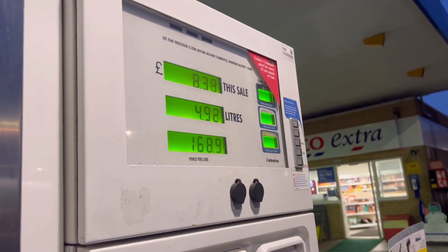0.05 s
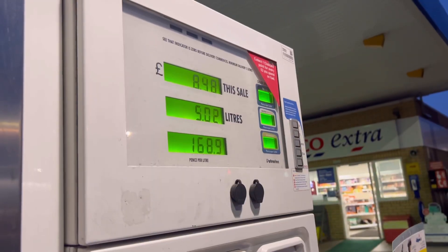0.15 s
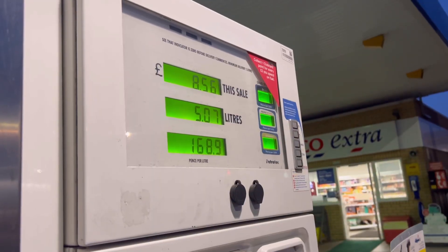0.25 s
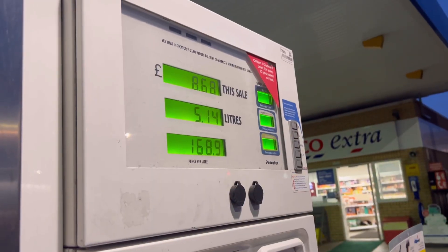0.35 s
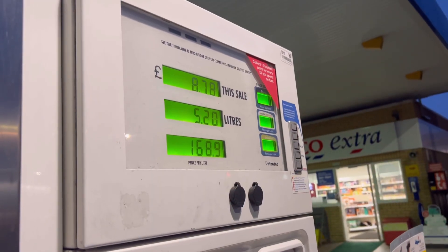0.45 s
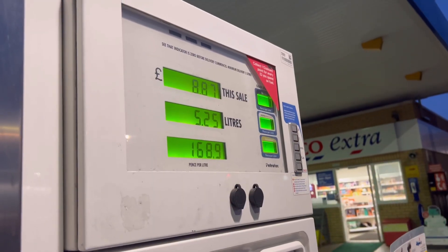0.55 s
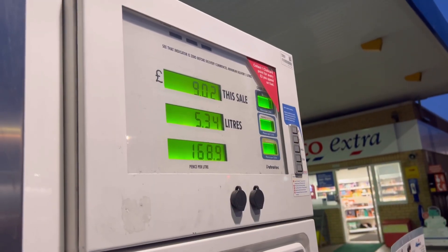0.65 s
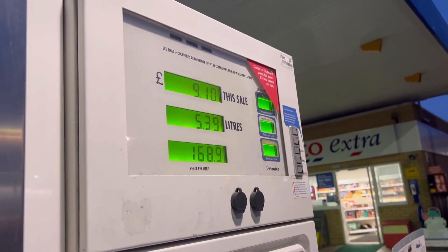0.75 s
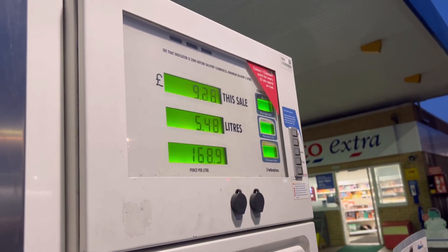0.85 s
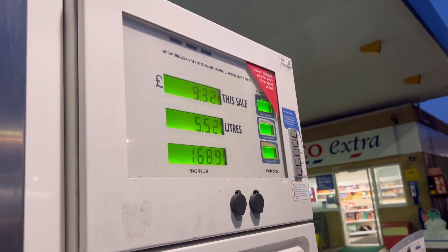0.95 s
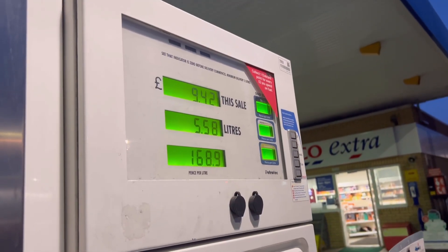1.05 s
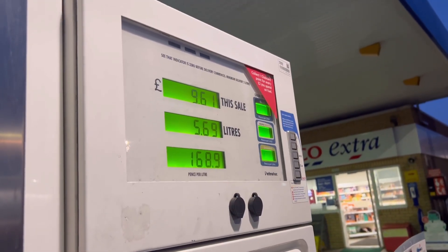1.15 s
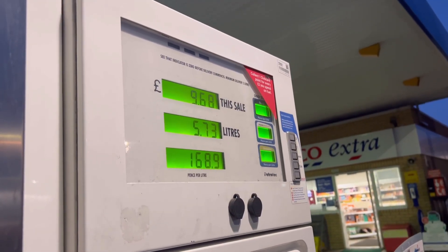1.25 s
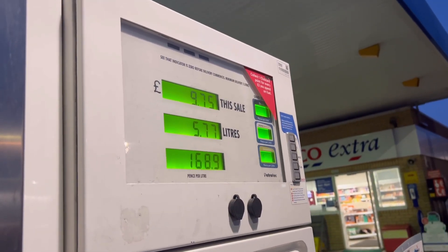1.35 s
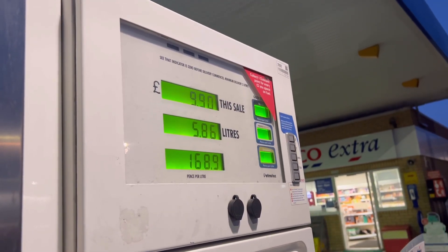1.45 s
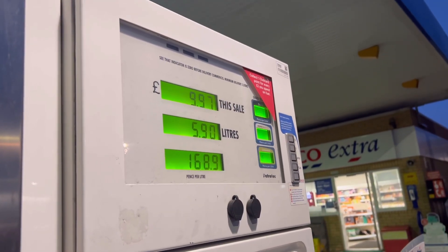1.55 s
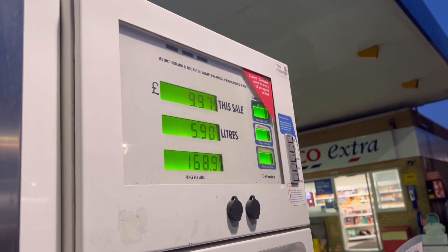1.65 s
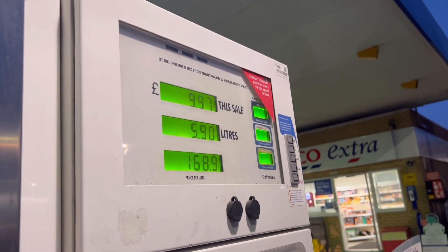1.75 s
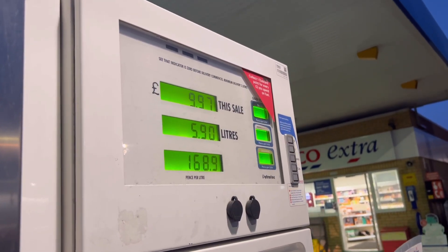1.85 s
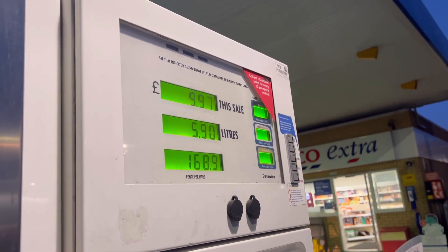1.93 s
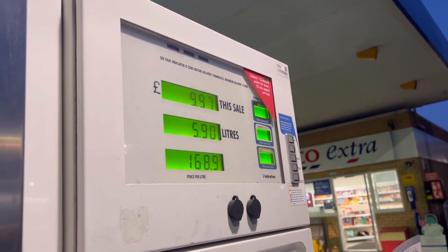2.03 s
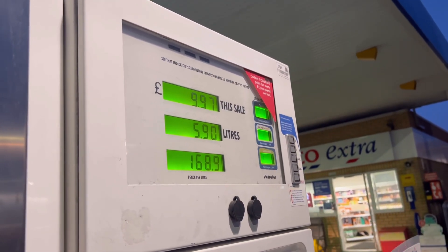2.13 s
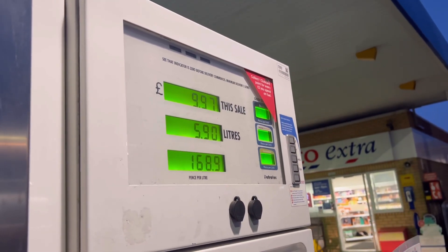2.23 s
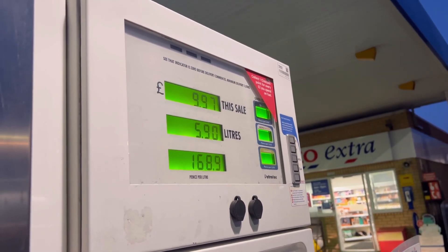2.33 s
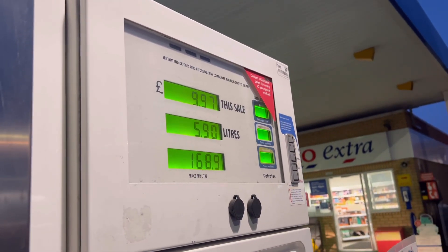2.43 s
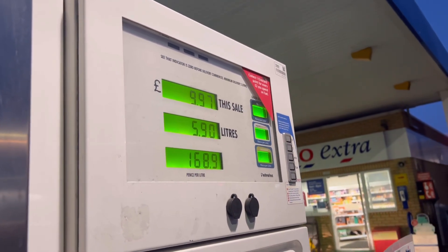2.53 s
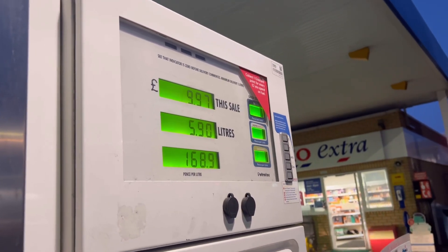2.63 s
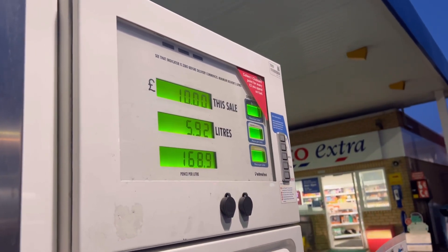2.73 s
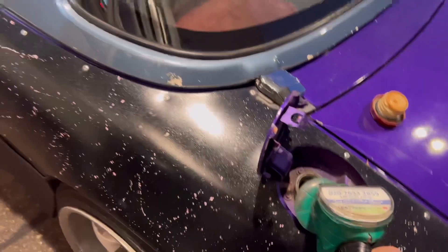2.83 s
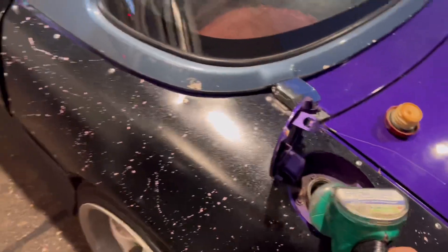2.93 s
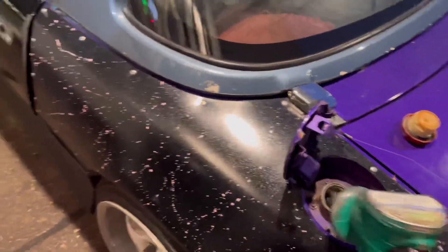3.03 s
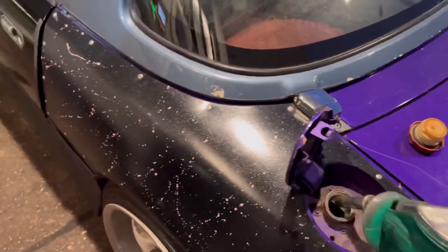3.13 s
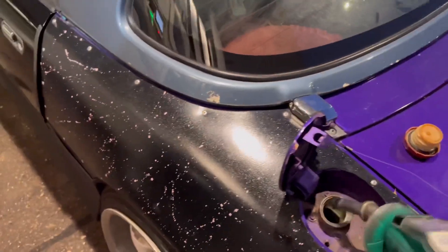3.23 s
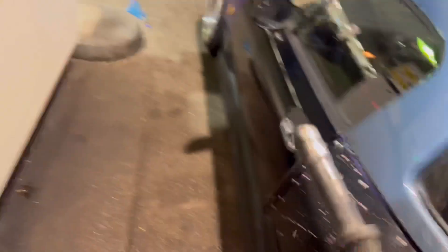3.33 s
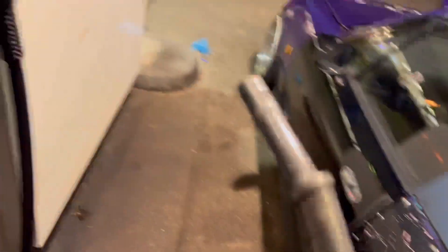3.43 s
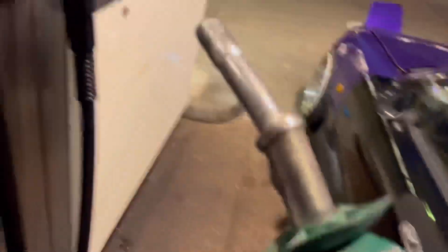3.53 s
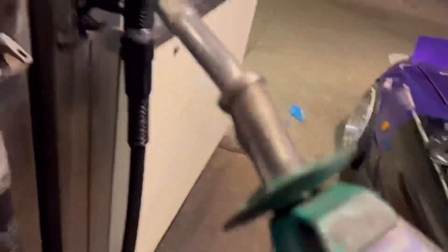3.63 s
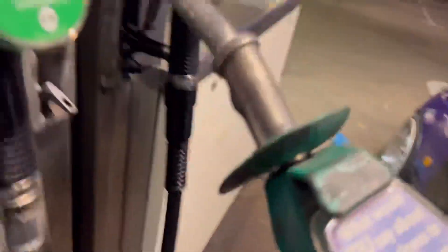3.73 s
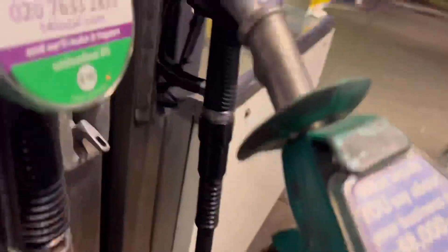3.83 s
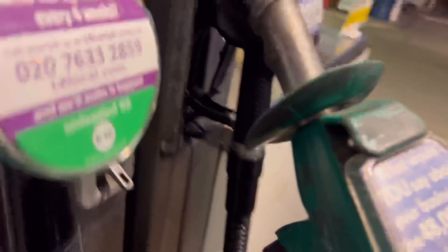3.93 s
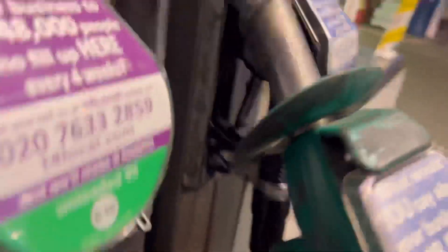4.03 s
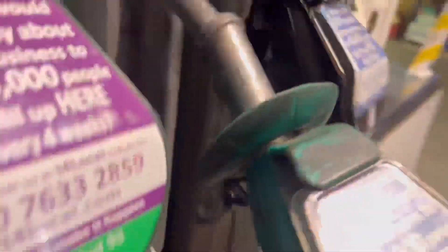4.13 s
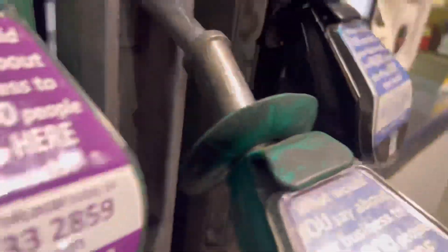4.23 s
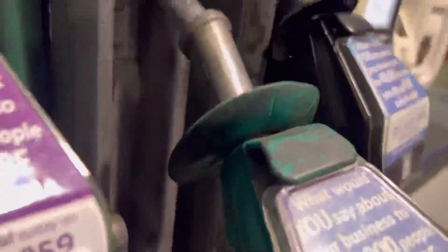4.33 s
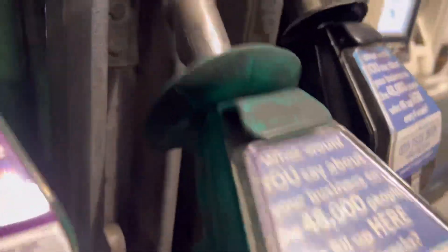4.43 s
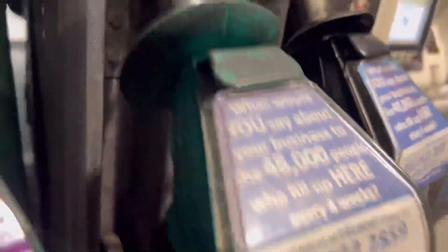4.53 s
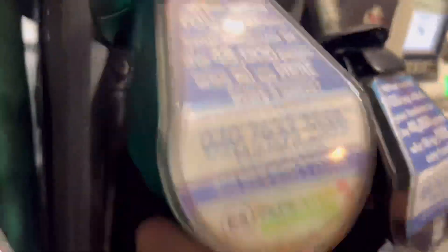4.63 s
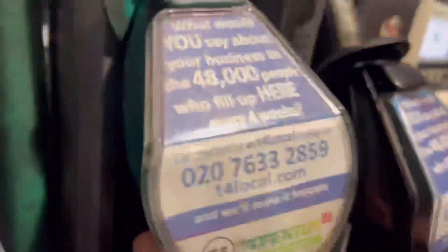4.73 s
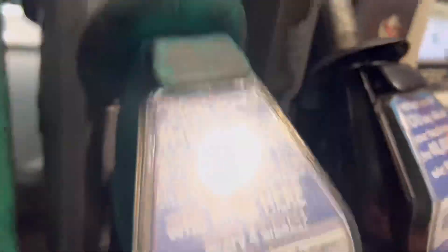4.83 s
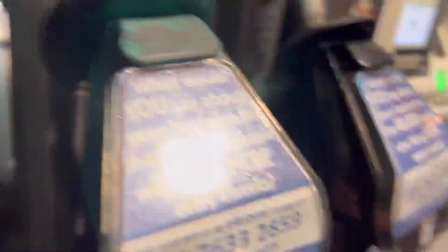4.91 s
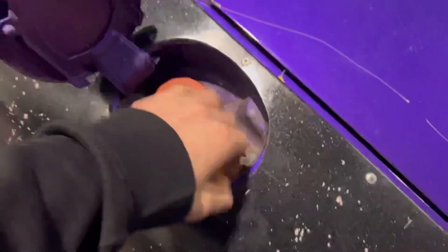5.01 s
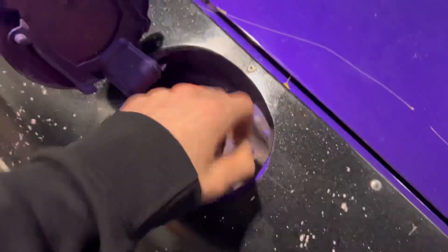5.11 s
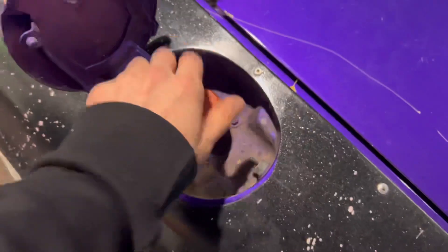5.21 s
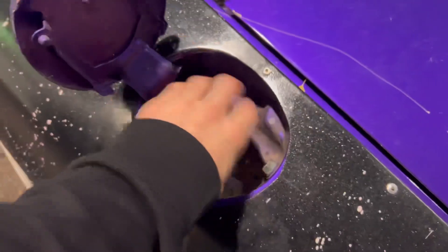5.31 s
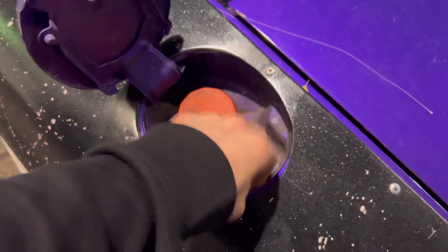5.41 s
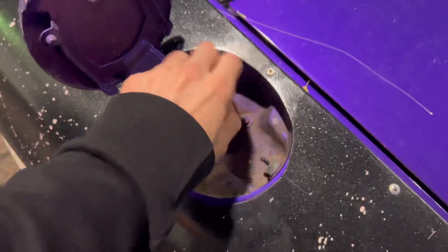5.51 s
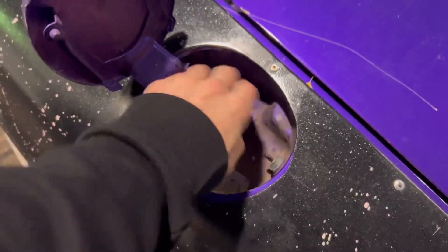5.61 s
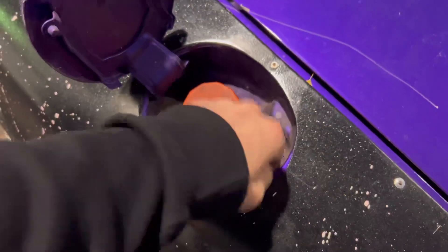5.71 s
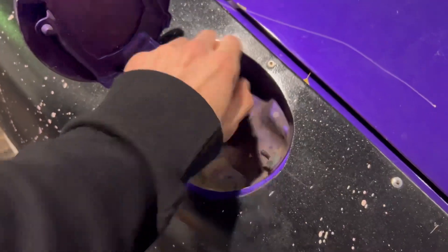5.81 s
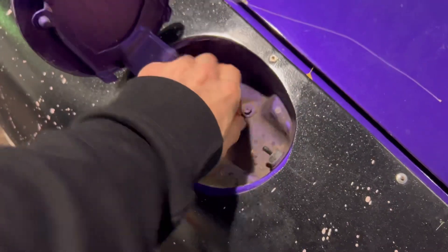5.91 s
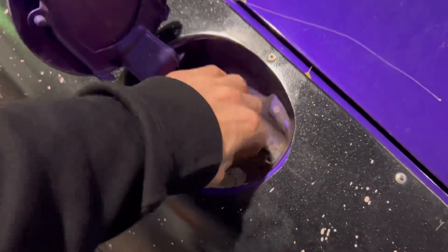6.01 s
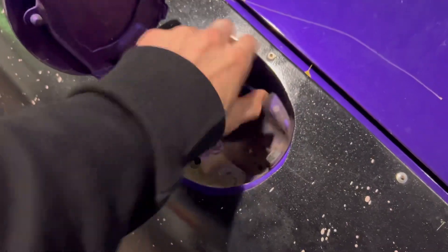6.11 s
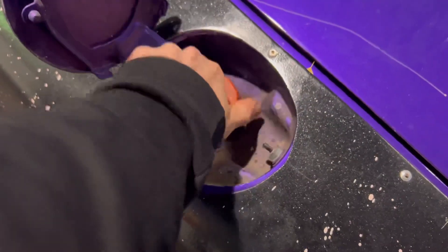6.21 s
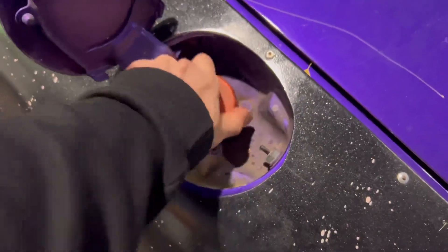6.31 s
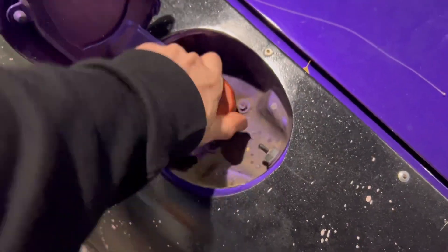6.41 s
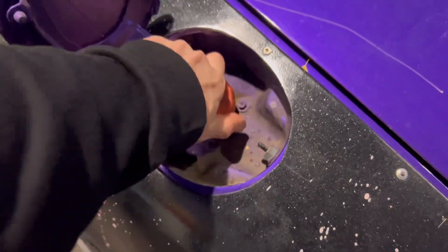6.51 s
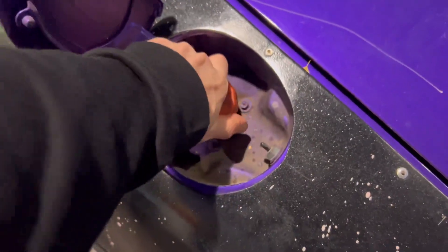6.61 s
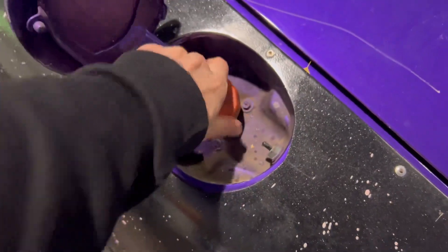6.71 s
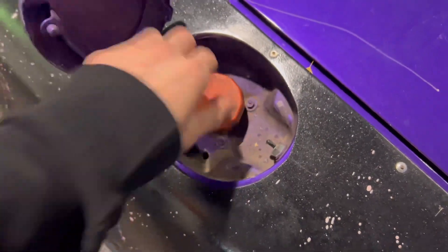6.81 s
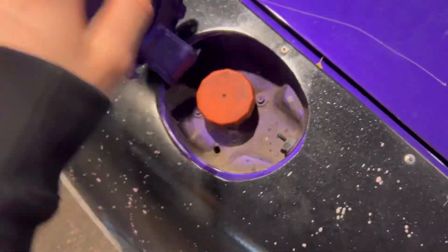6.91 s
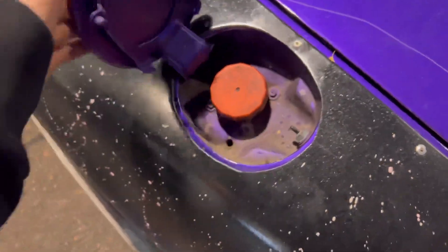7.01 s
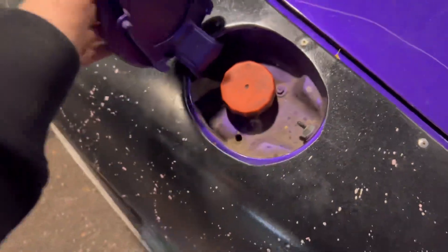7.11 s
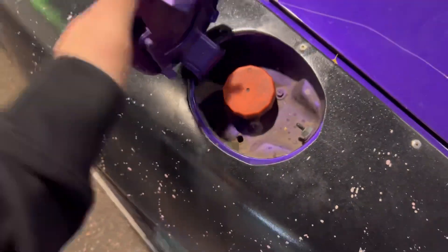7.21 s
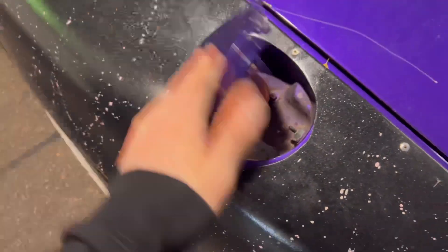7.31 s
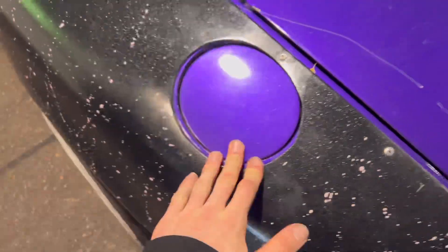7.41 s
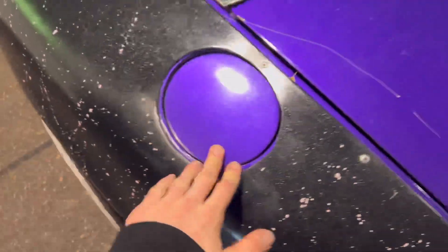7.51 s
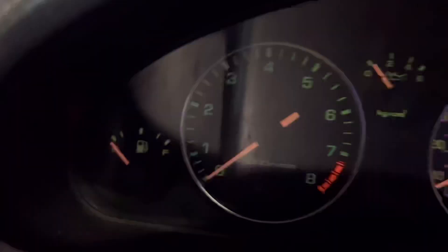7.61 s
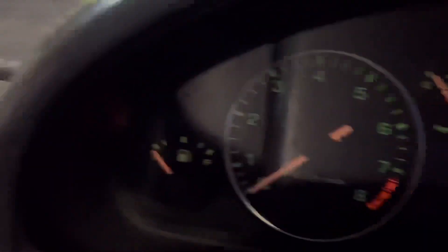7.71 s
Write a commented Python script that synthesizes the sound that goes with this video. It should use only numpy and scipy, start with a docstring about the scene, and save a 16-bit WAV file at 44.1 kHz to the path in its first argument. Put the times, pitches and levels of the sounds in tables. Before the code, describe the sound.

Outdoors under a station canopy, close handheld stereo microphone. A fuel pump hums and whines over rushing fuel. A metal nozzle clinks out of the filler neck, then scrapes and clatters into its holster as the pump cuts out. Far traffic remains faintly; a plastic cap knocks as it is screwed on, and a metal flap snaps shut with a low, short ring.

```python
"""A fuel pump drones close by: hum at shaft orders, a vane tone, whine and noise of rushing fuel.
The nozzle clinks out of the filler neck, scrapes and clatters into its holster: noise bursts through spout modes.
The pump sound fades out as far traffic, shaped noise, fades in; a plastic cap is screwed on and a sheet-metal
flap snaps shut, both as decaying modes with noise; the level dips briefly after the flap.
Low swells of rumble, enveloped noise, come and go."""
import sys
import numpy as np
from scipy import signal
from scipy.fft import rfft, irfft, next_fast_len
from scipy.io import wavfile
from scipy.ndimage import uniform_filter1d, map_coordinates

SR = 44100
rng = np.random.default_rng(int(sys.argv[2]) if len(sys.argv) > 2 else 0)


def int16_out(signal):
    """Quantize to a 16-bit WAV file."""
    q = np.round(np.clip(np.atleast_2d(signal).T, -1, 1) * 32767)
    wavfile.write(sys.argv[1], SR, q.astype(np.int16))


N = 342020  # samples


def amp(db):
    """Level in dB to amplitude factor."""
    return 10 ** (np.asarray(db) / 20)


def unit(x):
    """Scale to rms 1."""
    return x / np.sqrt(np.mean(x ** 2) + 1e-20)


def along(points, hz, axis=1):
    """One column of a table read on a log-frequency axis."""
    table = np.transpose(points)
    return np.interp(np.log(hz + 1), np.log(table[0] + 1), table[axis])


def curves(rows):
    """One value per sample for each column; silent outside the rows."""
    time_s, *columns = np.transpose(rows)
    return [np.interp(np.arange(N) / SR, time_s, column, -120, -120) for column in columns]


def ramp(start_s, lasts_s):
    """Rises from 0 to 1."""
    return np.clip((np.arange(N) / SR - start_s) / lasts_s, 0, 1)


def wobble(rate_hz):
    """A smooth random curve, rate_hz knots a second."""
    coarse = np.arange(0, N + 16, 16)
    knots = rng.standard_normal(int(N * rate_hz / SR) + 4)
    return np.interp(np.arange(N), coarse, map_coordinates(knots, [coarse * rate_hz / SR]))


def filtered(x, response):
    """x times a complex response of frequency."""
    m = next_fast_len(N + SR // 2)
    return irfft(rfft(x, m) * response(np.fft.rfftfreq(m, 1 / SR)), m)[..., :N]


def band(lo_hz, hi_hz):
    """A causal band-pass response with gentle skirts."""
    return lambda f: (1j * f / lo_hz / (1 + 1j * f / lo_hz) / (1 + 1j * f / hi_hz)) ** 2


# stereo likeness and phase by frequency: (frequency [Hz], likeness [0-1], phase lead of left [rad])
STEREO_LIKENESS = [(40, .9, 0), (100, .93, .2), (250, .86, .55), (500, .64, 1.4), (800, .6, 2.3),
                   (1100, .3, 1.7), (8500, .25, 1.6), (9900, .99, 3.14), (11400, .99, 3.14),
                   (12200, .99, 0), (14600, .99, 0), (15400, .97, -3.1)]
# the hand shades the right side; used below 10 kHz, times shade: (frequency [Hz], left over right [dB])
HAND_SHADOW = [(100, -2.5), (700, 3), (2000, 10), (2900, 2.5), (5200, 19.5), (8600, 5.5), (10000, 11.5)]


def stereo(pair, spectrum, shade):
    """Two unrelated signals become left and right with the table's likeness and phase."""
    def mix(hz):
        alike = along(STEREO_LIKENESS, hz)
        turn = np.exp(.5j * along(STEREO_LIKENESS, hz, axis=2))
        lean = amp(shade * along(HAND_SHADOW, hz) * (hz < 10000) / 2)
        gain = amp(along(spectrum, hz)) / np.sqrt(lean ** 2 + lean ** -2)
        return gain * np.array([lean * turn, alike / lean / turn, np.sqrt(1 - alike ** 2) / lean])
    left, shared, own = filtered(pair[[0, 0, 1]], mix)
    return np.array([left, shared + own])


def rush(levels_db, spectrum, shade, ripple_db, patchy_db, lumpy_db, throb):
    """Patchy noise in three layers, rumble, body and hiss, each at its own level."""
    z = signal.stft(rng.standard_normal((2, N)), nperseg=512)[2]
    patches = rng.standard_normal(z.shape[1:])
    patches = uniform_filter1d(uniform_filter1d(patches, 6, 0), 12, 1)  # over frequency, then time
    pair = signal.istft(z * amp(patchy_db * unit(patches)), nperseg=512)[1][:, :N]

    ripple = rng.standard_normal(SR // 40)  # many narrow resonances that stay put
    pair = filtered(pair, lambda f: amp(ripple_db * map_coordinates(ripple, [f / 25]) * (f > 300)))

    sound = stereo(pair * throb, spectrum, shade)
    low = filtered(sound, lambda f: 1 / (1 + (f / 230) ** 6))
    high = filtered(sound, lambda f: 1 - 1 / (1 + (f / 2700) ** 6))
    body = sound - low - high
    lumps = amp(lumpy_db * wobble(14))
    low_db, body_db, high_db = levels_db
    return amp(low_db) * unit(low * lumps) + amp(body_db) * unit(body) + amp(high_db) * unit(high)


def tone(hz, waver_db, drift_rad, lead_rad):
    """A slightly unsteady sine of rms 1; left leads right by lead_rad."""
    phase = 2 * np.pi * hz * np.arange(N) / SR + drift_rad * wobble(9) + rng.uniform(0, 7.3)
    return unit(amp(waver_db * wobble(15)) * np.sin([phase + lead_rad / 2, phase - lead_rad / 2]))


# hum and drone levels; the rise at 4.72 s is the thud and clatter of the nozzle
# (time [s], body level [dB], rumble level [dB])
PUMP_LEVELS = [(0, -25, -29), (.5, -25.5, -26.5), (1.34, -25.5, -25), (2.7, -27, -28.5), (3.3, -27.5, -30),
               (3.55, -25.5, -25.5), (4.2, -25.5, -28.5), (4.4, -28.5, -28), (4.72, -21.5, -38),
               (4.8, -40, -53)]
# (time [s], level at second shaft order [dB], level at third shaft order [dB])
HUM_LEVELS = [(0, -30, -29), (.5, -28, -25.5), (1.2, -35, -22), (1.7, -26.5, -27.5), (2.2, -36, -34),
              (2.75, -40, -31.5), (3.3, -34, -43), (3.45, -28.5, -26.5), (4.2, -54, -55),
              (4.72, -52, -25.5), (4.8, -59, -48)]
# whine at the start, mean of left and right: (frequency [Hz], level [dB])
WHINE_TONES = [(414.5, -43.5), (621, -43), (912, -51), (1472, -42.5), (1735, -48), (2010, -45), (2565, -48),
               (2695, -58), (2890, -50.5), (3336, -68)]
# relative spectrum of the drone: (frequency [Hz], level per Hz [dB])
CABINET_SPECTRUM = [(30, -33), (55, -15), (90, -12.5), (170, -14), (200, -16.5), (310, -13.5), (550, -13),
                    (1000, -17.5), (1700, -17), (2800, -23), (4600, -24.5), (6400, -31.5), (7500, -39),
                    (8800, -34.5), (11000, -42), (15500, -47.5)]
SHAFT_HZ, VANE_HZ = 48.45, 253
VANE_OVER_BODY_DB, HISS_OVER_BODY_DB = -5.5, -8.5
# the phone turns from the cabinet: the vane tone drops, the whine gains slightly
TURN_S, TURN_LASTS_S, VANE_TURNED_DB, WHINE_TURNED_DB = 3.36, 0.032, -4.5, 1


def pump():
    """Shaft orders, vane tone and whine over a drone that throbs once a turn."""
    body_db, rumble_db = curves(PUMP_LEVELS)
    second_db, third_db = curves(HUM_LEVELS)
    turned = ramp(TURN_S, TURN_LASTS_S)

    hum = amp(second_db) * tone(2 * SHAFT_HZ, waver_db=2.5, drift_rad=0.4, lead_rad=.2)
    hum += amp(third_db) * tone(3 * SHAFT_HZ, waver_db=1.8, drift_rad=0.6, lead_rad=0.3)

    vane_db = body_db + VANE_OVER_BODY_DB + VANE_TURNED_DB * turned
    vane = amp(vane_db) * tone(VANE_HZ, waver_db=1.5, drift_rad=0.5, lead_rad=0.6)

    whine = sum(amp(db) * tone(hz, waver_db=2, drift_rad=1.2, lead_rad=0.82) for hz, db in WHINE_TONES)
    whine *= amp(body_db - body_db[0] + WHINE_TURNED_DB * turned)  # follows the body level
    whine *= amp([[2.2], [-2.2]])  # left, right

    throb = 1 + 0.026 * np.sin(2 * np.pi * SHAFT_HZ * np.arange(N) / SR)
    fuel = rush([rumble_db, body_db, body_db + HISS_OVER_BODY_DB], CABINET_SPECTRUM, shade=0.66,
                ripple_db=2.0, patchy_db=1.0, lumpy_db=1.5, throb=throb)
    return hum + vane + whine + fuel


# nozzle contacts: (time [s], level [dB], knock [dB], treble [dB], favoured ring [Hz])
NOZZLE_CONTACTS = [(1.078, -28, -21, 2, 4400), (2.816, -44, -3, -9, 1950), (2.985, -21, -3, -30, 1510),
                   (3.008, -23, -6, -28, 1200), (3.0232, -11, -22, -13, 4400), (3.026, -18, -8, -24, 2830),
                   (3.111, -12, -13, -13, 4630), (3.125, -8.5, -16, -31, 5060), (3.142, 2, -23, -15, 4870),
                   (3.807, -19.5, 12, -27, 1500), (3.816, -21, 9, -5, 1080), (3.908, -34, -3, -19, 1340),
                   (4.2098, -12.5, -21, -14, 2040), (4.257, -10.5, -26, -16, 2030),
                   (4.259, -11.5, -22, -25, 4870), (4.4554, -13.5, -23, -10, 4030),
                   (4.477, -20, 7.5, -20, 920), (4.547, -9.5, -25, -11.5, 2100),
                   (4.591, -19.5, -10, -22, 2440), (4.602, -16, -18, -19, 2440),
                   (4.615, -11, -18, -7, 4800), (4.6153, -10.5, -22, -24, 2060),
                   (4.628, -10, -12, -10, 2500), (4.636, -11.5, -4, -10, 2480),
                   (4.6445, -3, -3.5, -17, 3440), (4.659, -8, -20, -22, 4400), (4.669, -9, -5, -27, 2220),
                   (4.692, -2.5, -1.5, -25, 3500), (4.7076, -6, 0, -9, 2670), (4.722, -7.5, 2.5, -15, 2270),
                   (4.735, -6.5, 0, -28, 985), (4.825, -15.5, -17, -12, 2060), (4.838, -12, -11, -29, 2590),
                   (4.8412, -2.5, -31, -26, 5970), (4.8434, 0.5, -6.5, -15.5, 3030),
                   (4.858, -14.5, 1.5, -8, 940)]
# nozzle sliding in its holster: (start [s], length [s], level [dB], treble [dB], favoured ring [Hz])
HOLSTER_SLIDES = [(3.812, 0.096, -18.5, 3, 2170), (4.211, .012, -8.5, -16, 2040),
                  (4.264, 0.023, -9.5, -17, 1250), (4.449, 0.0078, -7, 3.5, 2160),
                  (4.553, 0.057, -16, -7, 2160), (4.63, 0.047, -11, 4.5, 2480),
                  (4.701, 0.034, -7.5, -0.5, 2240), (4.773, 0.065, -20.5, -8, 2160),
                  (4.852, 0.036, -11.5, -8, 3420)]
# spectrum laid over all nozzle sound: (frequency [Hz], level per Hz [dB])
STEEL_SPECTRUM = [(150, -2), (600, 5.5), (1000, 15.5), (2200, 11.5), (3500, 3.5), (7000, -6), (9000, 0.5),
                  (15500, -7.5)]
SNAP_DB = 12.5  # strength of the shaking over a contact's level
RATTLE_T60_S, RATTLE_HZ, RATTLE_SHORTENS = 0.035, 2540, 0.53  # t60 at this ring; higher rings rattle shorter
NECK_UNTIL_S, NECK_DAMPS = 3.3, 2.2  # in the filler neck the spout rings and rattles this much shorter
SLIDE_ATTACK_S, SLIDE_RELEASE_DB_PER_S = 0.007, 452


def nozzle():
    """Each contact is a snap with a rattling tail; sliding is sharp uneven grit; both shake the spout."""
    t = np.arange(SR // 3) / SR
    f = np.fft.rfftfreq(len(t), 1 / SR)
    shake = np.zeros((2, N))

    def add(s, envelope, response):
        """Noise under an envelope through the spout, at the strength that the envelope gives."""
        z = rfft(envelope * rng.standard_normal((2, len(t)))) * response
        strength = np.linalg.norm(envelope) * np.linalg.norm(response)
        z *= strength / np.linalg.norm(z, axis=1, keepdims=True)
        shake[:, round(s * SR):][:, :len(t)] += irfft(z, len(t)) * (t < t[-1] / 2)

    for s, db, knock_db, treble_db, ring_hz in NOZZLE_CONTACTS:
        damp = NECK_DAMPS if s < NECK_UNTIL_S else 1
        t60_s = RATTLE_T60_S * (RATTLE_HZ / ring_hz) ** RATTLE_SHORTENS / damp
        rattle = amp(-60 * t / t60_s)
        snap = 2.2 * amp(-60 * t / 0.0051)
        onset = 1 - np.exp(-t / 0.0014)
        add(s, amp(db + SNAP_DB) * (rattle + snap) * onset, spout(f, ring_hz, knock_db, treble_db, damp))

    grit = unit(amp(5.5 * wobble(500) + 1.5 * wobble(60)))
    for s, length_s, db, treble_db, ring_hz in HOLSTER_SLIDES:
        release_db = SLIDE_RELEASE_DB_PER_S * np.clip(t - length_s, 0, 1)
        stroke = np.clip(t / SLIDE_ATTACK_S, 0, 1) * amp(db - release_db)
        scrape = amp(treble_db) * band(8300, 15300)(f)
        response = spout(f, ring_hz, knock_db=4.5, treble_db=-49) + scrape
        add(s, stroke * grit[round(s * SR):][:len(t)], response)
    return stereo(shake, STEEL_SPECTRUM, shade=0.79)


# undamped spout modes, levels after the steel spectrum: (frequency [Hz], width [Hz], level [dB])
SPOUT_MODES = [(153, 32, 10), (854, 170, 8), (1166, 52, 9), (1340, 42, 9), (1760, 51, 6.5),
               (2010, 110, -0.5), (2435, 190, -1.5), (2870, 180, -6), (3340, 140, -10), (3560, 160, -13),
               (4280, 110, -10), (4700, 150, -6), (4930, 170, -6.5), (6000, 110, -6), (8340, 45, 1),
               (14100, 280, -24)]
DETUNE = .012  # standard deviation of each mode's shift at each contact, share of its frequency


def spout(f, ring_hz, knock_db, treble_db, damp=1):
    """The spout's response: modes near the favoured ring speak most, over a dull knock and a bright fizz."""
    modes = 0
    for mode_hz, width_hz, db in SPOUT_MODES:
        near = 0.45 + 1.9 * np.exp(-(np.log(mode_hz / ring_hz) / 0.1) ** 2)
        size = near * amp(db - along(STEEL_SPECTRUM, mode_hz))
        c = mode_hz * rng.normal(1, DETUNE)
        w = width_hz * damp
        modes = modes + size * 1j * f * w / (c * c - f * f + 1j * f * w)

    favour = .5 + 1.08 * np.exp(-(np.log(f / ring_hz + 1e-9) / 0.3) ** 2)
    clank = band(.8 * max(ring_hz, 2000), 6000 / damp)(f) * 1.63 * damp * favour
    knock = amp(knock_db) * band(120, 1600)(f)
    fizz = amp(treble_db) * 7 * band(7000, 20000)(f)
    return (0.22 / damp + modes) * (knock + clank + fizz)


def struck(s, ring_db, tick_db, modes, short_db):
    """One blow: modes at fresh strengths and slightly shifted, a woolly crack and a bright tick."""
    t = np.arange(SR // 2) / SR
    ring = 0
    for hz, db, t60_s in modes:
        is_long = t60_s > .1
        level_db = db + rng.normal(0, 2.4) + (ring_db if is_long else short_db)
        shifted_hz = hz * rng.normal(1, .004 if is_long else .03)
        ring = ring + amp(level_db - 60 * t / t60_s) * np.sin(2 * np.pi * shifted_hz * t)

    noise = rng.standard_normal(len(t) + 1)
    woolly = uniform_filter1d(noise[1:], size=9) - uniform_filter1d(noise[1:], size=60)
    crack = amp(short_db + 7.0 - 60 * t / 0.039) * woolly
    tick = amp(tick_db - 60 * t / 0.0059) * np.diff(uniform_filter1d(noise, size=2))

    out = np.zeros(N + SR)
    out[round(s * SR):][:len(t)] = ring * (1 - np.exp(-t / 0.00066)) + crack + tick
    return out[:N]


# cap threads catching: (time [s], level [dB], tick over level [dB])
CAP_CATCHES = [(5.323, -25, -25.5), (5.361, -13, -48), (5.422, -22, -28), (5.442, -21, -27),
               (5.461, -16.5, -80), (5.577, -17, -12), (5.651, -19, -11), (5.915, -31, -12),
               (6.2, -35, -20)]
# modes of the plastic cap: (frequency [Hz], level [dB], t60 [s])
PLASTIC_MODES = [(257, 4.5, 0.058), (730, -1.5, 0.1), (893, 3, 0.061), (1116, 3.5, 0.035),
                 (1254, 12.5, 0.034), (1750, 9.5, 0.024), (4100, -7, 0.0244)]


def cap():
    """The plastic cap knocks as its threads catch."""
    return sum(struck(s, db - 5, db + tick_db, PLASTIC_MODES, db - 11.0) for s, db, tick_db in CAP_CATCHES)


# flap contacts: (time [s], level [dB], long ring over level [dB], tick over level [dB])
FLAP_CONTACTS = [(7.011, -36, -11, 10), (7.358, -33, -21, -2), (7.369, -7.5, -30, -4),
                 (7.3867, -14, -1.5, -25)]
# modes of the sheet-metal flap: (frequency [Hz], level [dB], t60 [s])
PANEL_MODES = [(120, -6.5, 0.11), (167, -13, 0.13), (234, -4, 0.19), (280, -4, 0.11), (325, 0, 0.11),
               (426, -10, 0.23), (540, -3, 0.21), (547, 8, 0.032), (619, -2, 0.31), (950, 4.5, 0.018),
               (1410, -17, 0.02), (1870, -4, 0.027), (2860, -8, 0.039), (5580, -19, 0.024)]


def flap():
    """The flap hits its stop, bounces and rings low."""
    return sum(struck(s, db + ring_db, db + tick_db, PANEL_MODES, db)
               for s, db, ring_db, tick_db in FLAP_CONTACTS)


# decay of the surroundings: (frequency [Hz], t60 [s])
CANOPY_DECAY = [(200, 0.22), (2000, 0.21), (5000, 0.055), (10000, 0.059)]


def canopy(x):
    """The roof and the car's side answer, each frequency dying at its own speed."""
    hz, t, z = signal.stft(rng.standard_normal((2, SR // 2)), SR, nperseg=256)
    decay = amp(-60 * t / along(CANOPY_DECAY, hz)[:, None])
    tail = signal.istft(z * decay, SR, nperseg=256)[1]
    delayed = np.pad(x, (300, 0))[None]  # samples
    return signal.fftconvolve(delayed, tail / np.linalg.norm(tail[0]), axes=1)[:, :N]


# low swells: (time [s], level [dB], half length [s])
RUMBLE_SWELLS = [(3.52, -24, 0.049), (3.717, -21, 0.043), (3.857, -17.5, 0.051), (4.072, -23.5, 0.16),
                 (4.498, -21.5, 0.034), (4.69, -23.5, 0.035), (4.864, -28.5, 0.033), (6.924, -28.5, 0.062),
                 (7.706, -36.5, 0.062)]


def swells():
    """Low rumble that rises and falls, nearly alike left and right."""
    t = np.arange(N) / SR
    size = sum(amp(db) * np.exp(-((t - s) / half_s) ** 2) for s, db, half_s in RUMBLE_SWELLS)
    # (frequency [Hz], level per Hz [dB])
    spectrum = [(30, -16), (55, -2.5), (90, 4.0), (170, -1.0), (300, -11.0), (600, -68)]
    low = stereo(rng.standard_normal((2, N)), spectrum, shade=0)
    return size * unit(low)


# relative spectrum of the road: (frequency [Hz], level per Hz [dB])
ROAD_SPECTRUM = [(30, -26), (50, -2), (90, -4), (170, -8.5), (300, -11.5), (550, -16.5), (1050, -14.5),
                 (1700, -23.5), (2700, -27.5), (4500, -28.5), (7400, -39.5), (8700, -38), (11000, -47.5),
                 (15500, -55)]
# the level dips briefly after the flap: (time of the deepest [s], depth [dB])
LEVEL_DIPS = [(7.5, -11.5)]
DIP_FALL_S, DIP_RISE_S = 0.12, .13
DIP_BASS, DIP_TREBLE = 0.45, 1  # shares of the depth
TRAFFIC_FROM_S, TRAFFIC_RISE_S = 4.66, 0.05  # the road fades in under the end of the pump
RUMBLE_DB, TYRES_DB, FAR_HISS_DB = -35, -33.5, -47


def traffic():
    """Far tyres and engines as shaped noise."""
    dip_db = sum(db * (ramp(s - DIP_FALL_S, DIP_FALL_S) - ramp(s, DIP_RISE_S)) for s, db in LEVEL_DIPS)
    levels_db = [RUMBLE_DB + DIP_BASS * dip_db, TYRES_DB + dip_db, FAR_HISS_DB + DIP_TREBLE * dip_db]
    road = rush(levels_db, ROAD_SPECTRUM, shade=0.053, ripple_db=1.5, patchy_db=1.5, lumpy_db=-1.0, throb=1)
    return ramp(TRAFFIC_FROM_S, TRAFFIC_RISE_S) * road


def scene():
    """All layers; cap and flap lead slightly on the left."""
    close, steel = cap() + flap(), nozzle()
    lean = amp([[1.2], [-1.2]])
    lead_s = np.array([[.0001], [-.0001]])
    knocks = filtered(close, lambda f: lean * np.exp(2j * np.pi * f * lead_s))
    answers = amp(-18.0) * canopy(close) + amp(-13.0) * canopy(steel[0])
    return pump() + steel + knocks + answers + swells() + traffic()


TOP_HZ = 16100


def record(dry):
    """Peaks are softly clipped; the phone keeps nothing above its band limit."""
    soft = dry / (1 + np.abs(dry / .95) ** 6) ** (1 / 6)
    return filtered(soft, lambda hz: hz < TOP_HZ)


dry = scene()
out = record(dry)
int16_out(out)
```